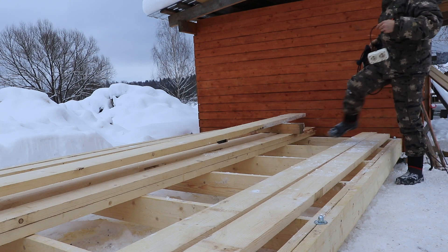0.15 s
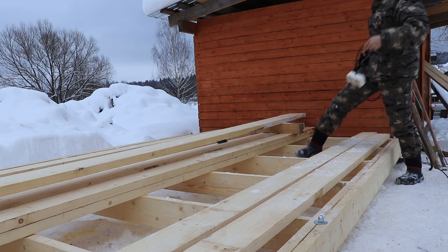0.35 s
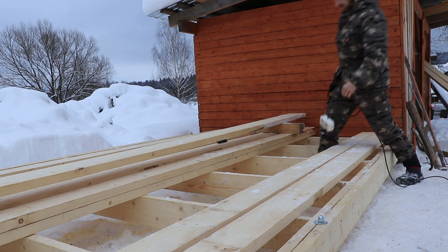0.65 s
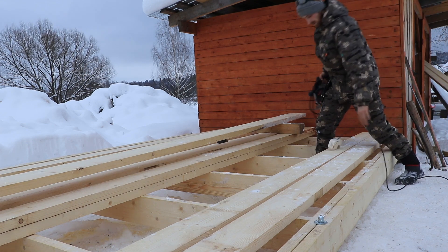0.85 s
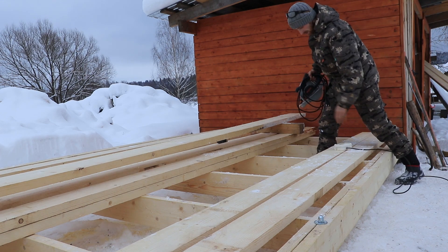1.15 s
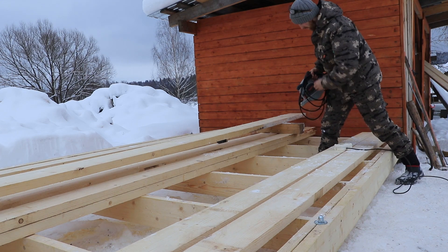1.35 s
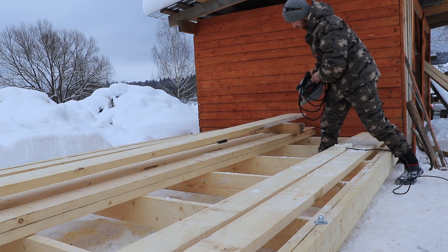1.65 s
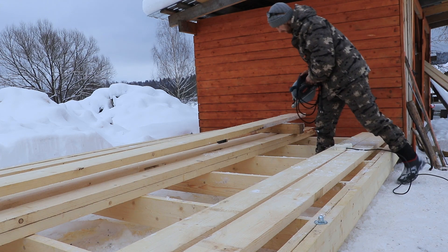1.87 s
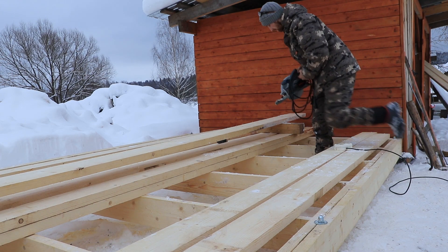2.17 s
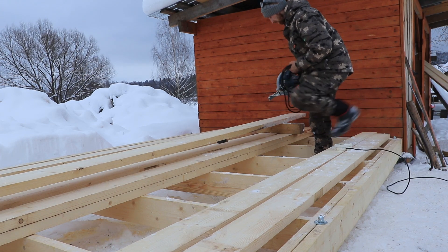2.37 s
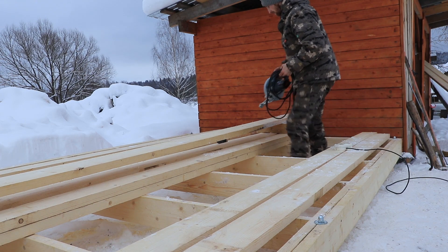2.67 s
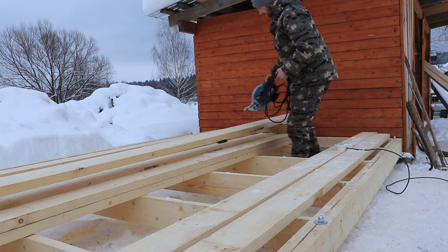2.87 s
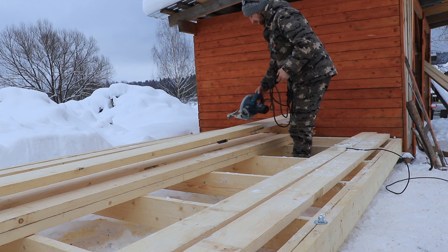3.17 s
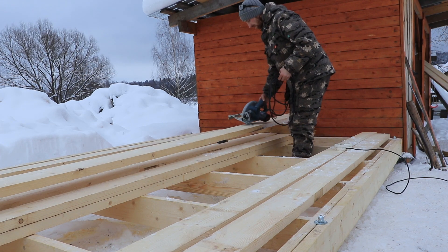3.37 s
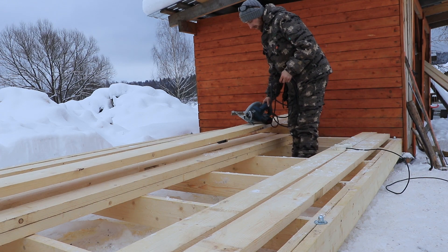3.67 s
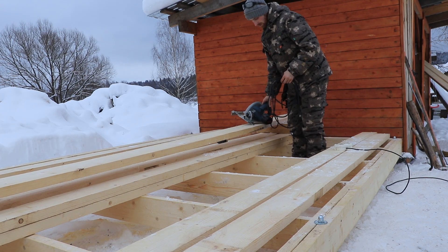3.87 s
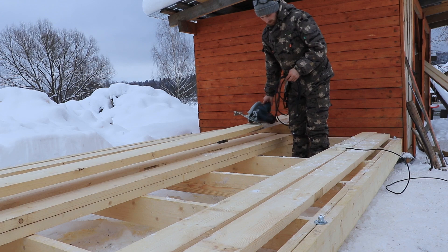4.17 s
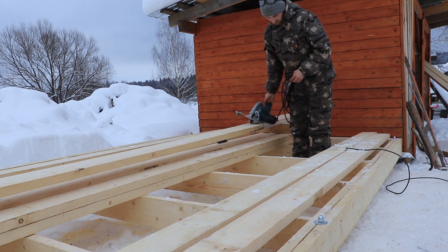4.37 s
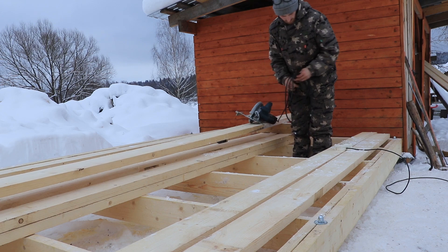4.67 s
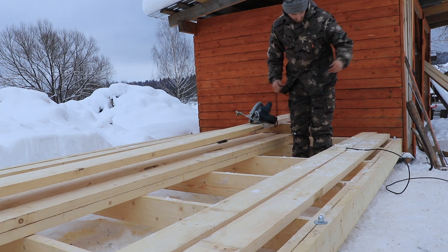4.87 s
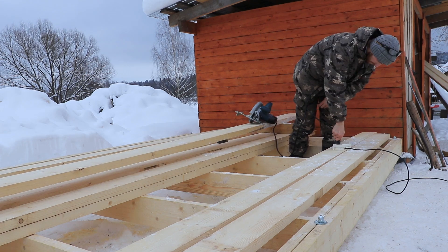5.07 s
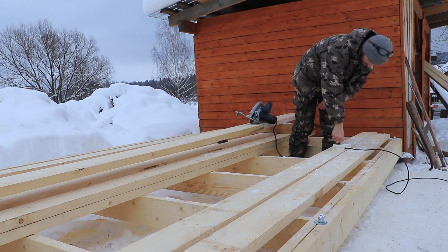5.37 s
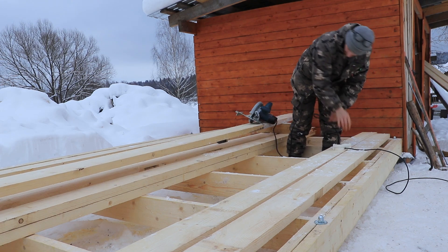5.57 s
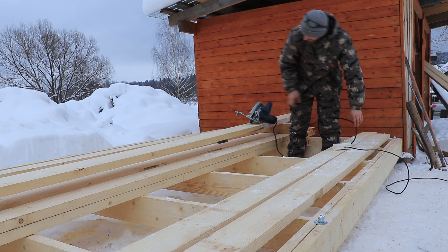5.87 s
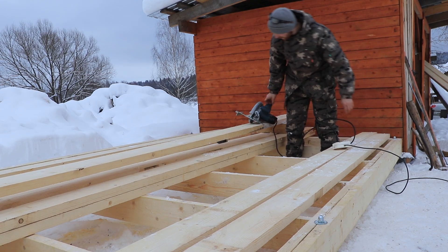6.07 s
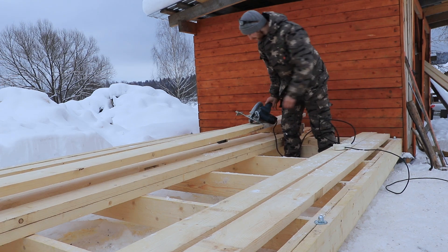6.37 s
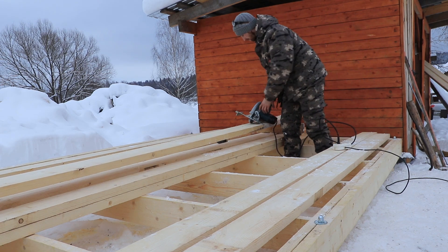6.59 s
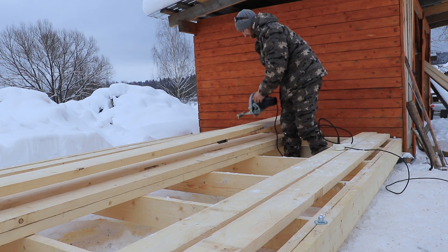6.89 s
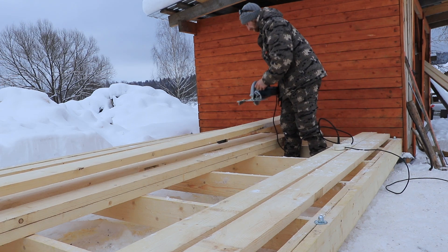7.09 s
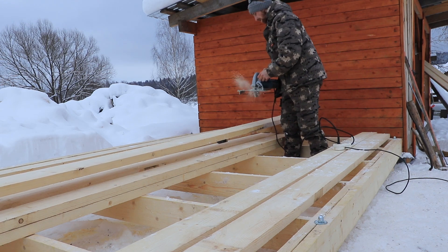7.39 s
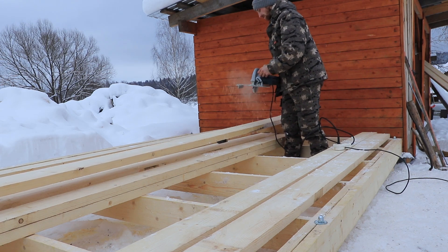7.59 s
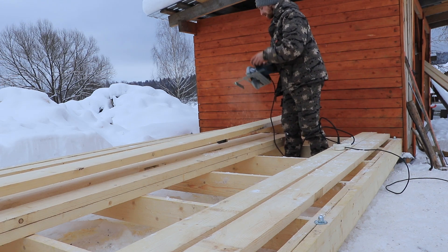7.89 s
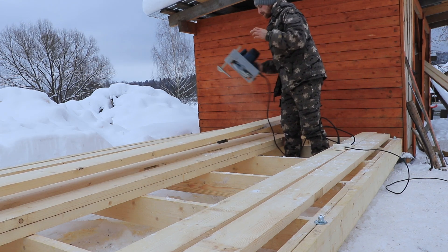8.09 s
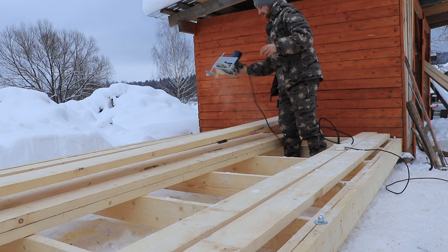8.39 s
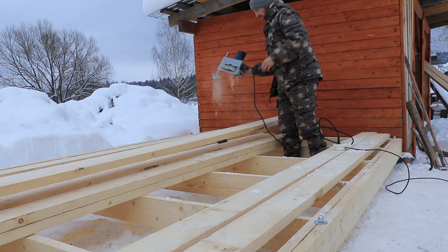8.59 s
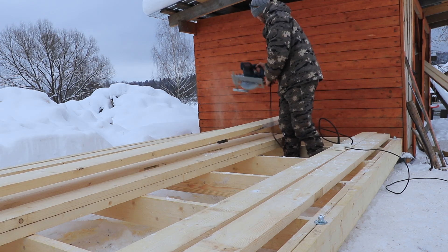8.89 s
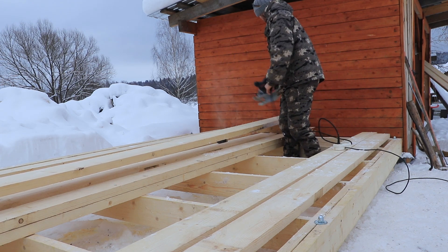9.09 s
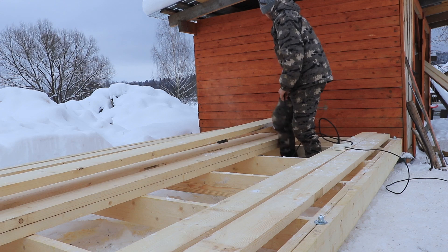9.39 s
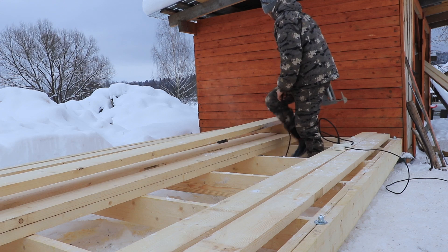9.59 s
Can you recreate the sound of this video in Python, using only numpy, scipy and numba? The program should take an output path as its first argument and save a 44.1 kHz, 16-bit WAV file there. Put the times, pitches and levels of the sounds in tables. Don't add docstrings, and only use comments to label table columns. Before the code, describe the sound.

Boots rustle and knock on a timber frame outdoors, a loud clack rings the planks, then a circular saw blips twice and whines down to rest.

```python
import sys
import numpy as np
from scipy import signal
from scipy.fft import rfft, irfft
from scipy.io import wavfile
from scipy.ndimage import uniform_filter1d
from numba import njit

SR = 44100
rng = np.random.default_rng(int(sys.argv[2]) if len(sys.argv) > 2 else 0)


def decibels_to_gain(level_db):
    exponent = np.asarray(level_db, float) / 20
    return 10 ** exponent


def store_pcm(level_fs):
    pcm = np.round(np.clip(level_fs, -1, 1) * 32767).astype(np.int16)
    wavfile.write(sys.argv[1], SR, np.atleast_2d(pcm).T)


N = 429534
TIME = np.arange(N) / SR

# (frequency [Hz], density [dB])
HISS = [(35, -45), (60, -19), (87, 7), (607, -1.5), (2300, -6), (6740, -12), (14900, -13), (16000, -15)]
HISS_DB = -57
# (peak time [s], rise [s], fall [s], level [dB])
GUSTS = [
    (.1, 0.33, .3, -56),
    (.73, 0.31, .3, -44),
    (1.36, 0.089, 0.18, -43),
    (1.9, .15, .8, -58),
    (2.79, 0.35, 0.16, -55),
    (3.42, 0.026, .3, -45),
    (3.66, .1, .05, -45),
    (4.4, .5, .6, -57),
    (5.86, .4, .3, -71),
    (8.3, 0.56, .08, -65),
]
CALM_DB = -73

# (peak time [s], rise [s], fall [s], level [dB], brightness [dB])
MOVES = [(.02, 0.11, 0.49, -55.5, 1), (.78, 0.16, 0.23, -46, -2.5), (.96, .06, 0.087, -47, 5),
         (1.16, 0.17, 0.24, -52, -4.5), (1.5, 0.092, 0.093, -52.5, 19), (1.92, 0.23, 0.22, -47.5, -1.5),
         (2.2, 0.39, 0.2, -50, 7), (2.42, 0.35, 0.43, -44.5, 6.5), (2.8, 0.23, 0.081, -49, -1.5),
         (3.56, .12, 0.19, -47.5, -5), (3.929, 0.16, 0.17, -49, -1), (4.29, 0.12, 0.057, -54, -11),
         (5.05, 0.28, 0.092, -58, 1), (5.2, 0.33, 0.52, -56.5, -8), (5.56, 0.063, 0.079, -50, -4.5),
         (5.8, 0.099, 0.16, -49.5, 6), (5.99, 0.38, 0.5, -49, -0.5), (6.36, 0.22, .15, -53.5, -4),
         (6.78, 0.62, 0.47, -51.5, -3.5), (7.16, 0.44, 0.41, -60, -8.5), (9.1, 0.54, 0.12, -40, 8.5),
         (9.45, 0.36, 0.15, -47.5, 0.5), (9.559, 0.23, 0.049, -42.5, 3), (9.68, 0.097, 0.054, -46.5, -0.5)]
STILL_DB = -58.5
FADE_DB = 11

# (time [s], peak level [dB], brightness [dB], ring t60 [s])
STEPS = [(.258, -37, -4, 0.031), (.288, -38, -12, 0.035), (.404, -29, -7.5, 0.027), (.525, -36.5, -2, 0.04),
         (.683, -26.5, -24, 0.042), (1.615, -33, -9, 0.034), (2.07, -46, -30, 0.11),
         (2.749, -22, -11, 0.019), (3.301, -41, -8, 0.056), (3.786, -37.5, -13, 0.11),
         (3.859, -38.5, -6, 0.064), (4.997, -39.5, -3, 0.069), (5.619, -33, -8, 0.031),
         (5.824, -30, -24, 0.04), (6.299, -34.5, 0.5, 0.058), (6.801, -37, -26, 0.022),
         (7.034, -41.5, -20, 0.022), (7.057, -35, -11, 0.041), (8.547, -34.5, -10, 0.059),
         (8.92, -43, -14, 0.043), (9.059, -35.5, 5, 0.032), (9.197, -39, -22, 0.094),
         (9.39, -43, -18, 0.067)]
THIN_BLOWS = [(.64, -22, -55, 0.055), (.947, 11, -18, 0.016), (.951, 11.5, -12, 0.016), (.961, 2, -3, 0.022),
              (1.065, 1, -26, 0.012), (1.071, -1, -20, 0.011), (5.158, -32.5, -13, 0.034),
              (5.249, -35.5, -6, 0.17), (5.288, -20, -11, 0.04), (5.317, -14, -12, 0.017),
              (5.327, -29, 9, 0.015), (5.335, -29.5, -14, 0.11), (5.465, -28, -24, 0.014),
              (1.09, -24, -33, 0.045), (1.179, -31, -12, .05), (1.259, -36, -8, .03), (1.335, -40, -8, .02),
              (1.381, -38, -8, .035), (5.955, -4, -26, 0.014), (5.972, -24.5, -39, .051), (6.153, -43, 9, 0.072),
              (6.824, -41, 2, 0.044), (6.922, -23, -22, 0.007), (4.882, -41.5, 0, 0.033)]
SET_DOWNS = [(2.762, -29, 4, 0.032), (2.777, -33.5, -12, 0.037), (3.4, -3, -30, .012),
             (3.403, 2, -28, 0.012), (3.41, -19, -30, 0.14), (3.432, -31, -22, 0.24),
             (3.452, -34, -35, 0.085), (3.519, -26, -14, 0.029), (3.575, -27, -6, 0.13),
             (3.627, -33, -20, 0.14), (3.976, -34, -5, 0.12), (4.138, -34.5, -16, 0.44),
             (4.2, -25, -16, 0.052), (4.219, -31, -22, 0.28), (4.262, -22, -14, 0.035),
             (4.282, -25.5, -22, 0.074), (4.309, -42, -19, .14)]
CLINKS = [(.84, -39, 16, 0.14), (.929, -47, 15, 0.038), (1.566, -46.5, 9.5, 0.18), (2, -41, 10, 0.059),
          (2.291, -33, -8, 0.02), (2.306, -35, 0, .015), (2.327, -30.5, 0, 0.054), (2.362, -37, 23, 0.019),
          (2.368, -34, 13, 0.028), (2.425, -44, 18, 0.06), (3.532, -46, 16, .06), (4.738, -45.5, 7, 0.05),
          (5.229, -34, 6, 0.02), (5.243, -48, 8, .02), (5.26, -42, 0, .02), (5.278, -38, 4, .02),
          (5.492, -43, 10, .02), (5.551, -27, 6, 0.026), (5.588, -38, -5, .03), (6.082, -45.5, 16.5, 0.055),
          (6.329, -36.5, -2, 0.068)]
# (thud [dB], tick [dB], tick gained per brightness [dB/dB], low cut [Hz])
STEP_COLOUR = (2.25, -22, .2, 60)
THIN_COLOUR = (-22.5, -50, 0.27, 190)
SET_DOWN_COLOUR = (-8, -37, 0.14, 50)
CLINK_COLOUR = (-25, -23, .6, 300)
JOLT_COLOUR = (-15, -11, .1, 150)

# (frequency [Hz], level [dB], t60 [s])
SOLE = [(1188, 9, 0.088), (2300, 0.5, 0.11), (2850, 0, 0.14), (3450, -5, 0.15), (1690, -4, 0.078),
        (2050, 1, 0.087), (4400, -15, .08), (5100, -7, .08)]
PLANK = [(211.3, -1.5, .37), (280, -9.5, 0.38), (338, -11.5, 0.28), (407, -3.5, 0.21), (470, -3, 0.13),
         (567, -4.5, 0.22), (658, 2, .16), (741, -4, 0.15), (840, -1.5, .1), (914, -8, 0.117),
         (1020, -12, 0.08), (1265, -17, .08), (1455, -13, .06)]
BEAM = [(119.6, -6, 0.8), (226.8, 0, 0.32), (390, -17, 0.64), (750, 4.5, 0.14), (1180, -19, 0.22),
        (1300, -9, 0.098), (1650, -7, 0.1)]
CLIP = [(896, -4, 0.084), (1690, 1.5, 0.13)]
SLAT = [(513, -11, .08), (690, -1, 0.13), (765, 1, 0.11), (1360, -16, 0.076)]
BOARD = [(220, -7, 0.27), (301, -12, .15), (338, -7.5, 0.21), (427, 0.5, 0.099), (534, -3, 0.15),
         (596, -0.5, 0.061), (700, -6, .18), (750, -10, .16), (830, -5, .18), (938, -4, .14),
         (1070, 0, 0.065), (1190, -12, 0.11)]
BASE = [(724, 0, 0.097), (814, -12, 0.19), (1098, -3, 0.21), (1310, -10, 0.16), (1650, -17, 0.15),
        (2060, -22, 0.2), (2234, -19, 0.2), (2643, -8, 0.083), (2896, -19, 0.12), (3365, -17, 0.071)]
# (level [dB], modes as above)
RINGS = [(-14, PLANK), (-19.5, PLANK), (-23.5, BEAM), (-38, BEAM), (-49, BEAM[:3]), (-29.5, BOARD),
         (-34.5, SOLE[1:]), (-41.5, SOLE), (-37.5, SOLE), (-34, PLANK[3:]), (-29, BOARD[:6]), (-34, CLIP),
         (-22, SLAT), (-38, SLAT), (-50, SLAT), (-26, BASE), (-47, SOLE), (-47, SOLE), (-40, PLANK[3:]),
         (-22, BOARD[:3]), (-41, SOLE[:1]), (-33, BEAM[:1])]
RING_S = [.948, 1.068, 3.403, 4.263, 2.75, 5.956, .841, 2.327, 2.424, 5.288, 5.826, 6.824, 5.284, 5.465,
          4.998, 3.404, 3.577, 4.202, 1.184, 3.432, 3.519, 1.07]

# (time [s], length [s], level [dB])
CRUNCHES = [
    (2.536, 0.017, -34),
    (2.583, 0.021, -39.5),
    (2.609, 0.0075, -38.5),
    (5.577, 0.021, -48),
    (9.652, 0.021, -36.5),
    (9.697, 0.016, -38),
]
# (peak time [s], rise [s], fall [s], level [dB], treble [dB])
DRAGS = [
    (3.47, 0.037, 0.077, -35, 5),
    (3.64, 0.042, 0.042, -40, 9),
    (4.165, 0.029, 0.036, -37.5, 5),
    (4.23, 0.032, .04, -40, 1),
    (4.28, 0.024, 0.044, -35, 4),
    (4.33, .03, 0.038, -41.5, -7),
]
# (frequency [Hz], width [Hz], level [dB])
SOLE_SONG = [(376, 107, 3), (697, 47, -2), (1130, 35, -8), (1300, 23, -1), (1480, 22, -3), (2910, 18, -18),
             (3270, 16, -18), (5200, 79, -18)]
# (time [s], length [s], frequency [Hz], level [dB], sag [Hz])
SQUEAKS = [
    (4.12, 0.07, 7900, -68, 151),
    (4.33, .1, 7850, -64, 50),
    (4.428, .06, 7850, -63, 650),
]

# (time [s], slot rate [Hz])
RUN_UP = [
    (7.35, 300),
    (7.47, 1900),
    (7.52, 2180),
    (7.6, 2040),
    (7.69, 3800),
]
# (from [s], to [s])
PULLS = [
    (7.352, 7.49),
    (7.6, 7.7),
]
# (time [s], level [dB])
KICK = [
    (7.347, -40),
    (7.354, -18),
    (7.366, -10),
    (7.43, -17),
    (7.5, -22.5),
    (7.58, -22.5),
    (7.61, -16.5),
    (7.7, -19.5),
]
# (time [s], level [dB])
RUN_DOWN = [
    (7.9, -19.5),
    (8.1, -22),
    (8.41, -22.5),
    (8.45, -28),
    (8.65, -30.5),
    (8.98, -42),
    (9.1, -50),
    (9.21, -51),
    (9.3, -60),
]
# (time [s], peak level [dB], brightness [dB], ring t60 [s])
JOLTS = [(7.36, -13, -10, 0.014), (7.371, -11, -9, 0.018), (7.594, -28, 20, 0.037), (7.601, -12, -6, 0.021),
         (7.671, -20, 5, .01), (7.922, -24, 15.5, 0.03), (7.988, -16.5, 15.5, 0.017),
         (8.256, -24, -3, .015), (8.396, -28, 9, .012), (8.446, -29, 3, 0.011), (8.547, -27, 0, .012)]
# (frequency [Hz], width [Hz], level [dB])
CASING = [(625, 260, 2), (1000, 190, -17), (1330, 400, 3), (1560, 240, -3), (2280, 1140, -3.5)]
# (frequency [Hz], width [Hz], level [dB])
GUARD = [(2980, 200, -1), (3580, 350, 2), (4850, 850, 1)]
# (frequency [Hz], width [Hz], level [dB])
BLADE = [(923, 31, -17), (1300.5, 44, 2), (1696, 6.3, -7.5), (2066, 23, -4.5), (2935, 59, -3),
         (3090, 35, -9.5), (3665, 59, -9.5)]
# (slot rate [Hz], level [dB])
BLADE_RING = [(1450, 2), (1850, 5.5), (2400, 6.5), (3100, -4.5)]
# (peak time [s], rise [s], fall [s], level
# [dB], frequency [Hz], width [Hz])
SINGING_BANDS = [(7.41, 0.03, 0.06, -17, 1290, 40), (7.54, .04, 0.055, -22, 1650, 110),
                 (7.565, 0.016, 0.016, -25, 598, 80), (7.61, 0.014, 0.12, -29.5, 595, 89),
                 (7.99, .02, 0.036, -18.5, 3440, 160), (7.58, 0.043, .02, -23, 4060, 120),
                 (8.41, 0.023, 0.019, -25, 930, 70), (8.97, 0.023, .025, -43, 1290, 40),
                 (9.07, .02, 0.018, -43, 1300, 40), (9.145, 0.033, .015, -39, 1300, 30),
                 (7.7, .015, .02, -38, 11100, 1500), (8.345, .03, .03, -24, 2070, 30),
                 (8.32, .012, .015, -24, 3060, 60), (8.362, .012, .025, -22, 2910, 40),
                 (8.41, .015, .015, -28, 3600, 60), (8.325, .03, .012, -20, 1340, 70),
                 (8.495, .012, .012, -34, 3150, 120), (8.2, .1, .1, -30, 590, 90), (8.37, .05, .04, -25, 950, 350),
                 (7.86, .12, .1, -27, 3550, 180), (7.9, .1, .08, -27, 1600, 160), (7.93, .04, .05, -26, 520, 60)]
# (frequency [Hz], level [dB])
WHINE_PATH = [(60, -75), (280, -17), (920, -15), (1080, 3), (5400, 3), (6600, -12), (10500, -5),
              (16000, -24)]
# (multiple of pulse rate [1], level [dB])
HUM = [(2, -49), (3, -42), (4, -38), (5, -34), (6, -29), (7, -33), (8, -30), (10, -30), (11, -33),
       (12, -32), (13, -28)]

SLOTS, PINION, FAN_BLADES = 12, 7, 18
GEAR_RATIO, TURN_S = 5.6, 8.502
RELEASE_S, TOP_HZ, BRAKE_HZ_PER_S = 7.72, 3760, 3600
FRICTION_HZ_PER_S, DRAG_PER_S = 985, .965
BIND_S, BIND_OVER_S, BIND_HZ = 8.8, .05, 27
MAINS_HZ, HUM_DB = 100, 0.5
WHINE_DB, WHINE_DB_PER_ORDER, WHINE_DB_PER_DECADE, WHINE_AT_HZ = -33.5, -1.8, 9, 1200
BARS_DB, SHAFT_DB, FAN_DB = 4.5, -31, -30
MESH_DB, SIDEBAND_DB, MESH_HZ, MESH_WIDTH_HZ = -13, -19, 1330, 92
FAN_PEAK_HZ, FAN_WIDTH_HZ = 4900, 500
HOWL_HZ, HOWL_WIDTH_HZ, HOWL_DB = 1310, 110, 10
SLOW_HZ, SLOW_DB_PER_ORDER = 600, 1.6
SLACK_HZ, SLACK_DB, SLACK_DB_PER_DECADE = 3200, 4, 3
FLARE_HZ, FLARE_WIDTH_HZ, FLARE_DB, RIM_DB = 1660, 136, 17, -13


def level(x):
    return x / np.sqrt(np.mean(x ** 2))


def read(table, silent=-120.):
    s, values = np.transpose(table)
    return np.interp(TIME, s, values, silent, silent)


def band(x, lo_hz, hi_hz, order=2):
    return signal.sosfilt(signal.butter(order, [lo_hz, hi_hz], "bandpass", fs=SR, output="sos"), x)


def resonate(x, peaks):
    out = 0
    for k, (hz, width, db) in enumerate(peaks):
        out = out + (-1) ** (k // 2) * decibels_to_gain(db) * band(x, hz - width / 2, hz + width / 2, order=1)
    return out


def bump(hz, centre_hz, width_hz):
    return 1 / (1 + ((hz - centre_hz) / width_hz) ** 2)


def walk(rate):
    k = int(SR / rate)
    steps = np.repeat(rng.standard_normal(N // k + 1), k)
    return 1.45 * uniform_filter1d(uniform_filter1d(steps, k), k)[:N]


def grit(scatter_db):
    size = np.minimum(rng.exponential(size=N // 32 + 1), 3.5)
    return level(rng.standard_normal(N) * decibels_to_gain(scatter_db * np.repeat(size, 32)[:N]))


def swell(s, rise_s, fall_s, db):
    away = np.where(TIME < s, (s - TIME) / max(rise_s, .01), (TIME - s) / max(fall_s, .01))
    return decibels_to_gain(db - FADE_DB * away)


def add(out, s, sound):
    i = int(s * SR)
    out[i:i + len(sound)] += sound[:N - i]


def air_floor():
    hz, db = np.transpose(HISS)
    bins_hz = np.arange(1, N // 2 + 2) * SR / N
    shape = decibels_to_gain(np.interp(np.log(bins_hz), np.log(hz), db))
    hiss = level(irfft(rfft(rng.standard_normal(N)) * shape, N)) * decibels_to_gain(HISS_DB)
    wind = decibels_to_gain(CALM_DB) + np.max([swell(*gust) for gust in GUSTS], axis=0)
    rumble = level(band(rng.standard_normal(N), 6.5, 43, order=3))
    return hiss + rumble * wind * decibels_to_gain(walk(8.3))


def rustle():
    body, scrape, swish = decibels_to_gain(STILL_DB + 1.0), decibels_to_gain(STILL_DB), decibels_to_gain(STILL_DB - 5)
    for s, rise_s, fall_s, db, bright_db in MOVES:
        effort = swell(s, rise_s, fall_s, db)
        body = np.maximum(body, effort * decibels_to_gain(0.4 - bright_db))
        scrape = np.maximum(scrape, effort)
        swish = np.maximum(swish, effort * decibels_to_gain(-10 + 0.33 * bright_db))
    grains = grit(2.6)
    low = level(band(grains, 115, 1120))
    mid = level(band(grains, 520, 3320))
    high = band(grains, 2360, 5400) + 0.63 * band(grains, 4900, 4920) + 0.44 * band(grains, 4200, 12300)
    out = body * decibels_to_gain(0.64 * walk(23)) * low
    out = out + scrape * decibels_to_gain(1.5 * walk(33)) * mid
    return out + swish * decibels_to_gain(0.6 * walk(27)) * level(high)


def knocks(kinds):
    out, hz = np.zeros(N), 125 * 2 ** np.arange(0, 7, .5)
    t = np.arange(int(.3 * SR)) / SR
    noise = rng.standard_normal(N)
    bands = np.array([level(band(noise, f / 1.25, f * 1.25)) for f in hz])
    push = np.array([band(1. * (t == 0), f / 1.3, f * 1.3, order=3) for f in hz])
    push = push / np.abs(push).max(axis=1)[:, None]
    rise = 1 - np.exp(-t * hz[:, None] / .8)
    colour_hz = [125, 180, 300, 480, 1000, 2500, 7000, 14000]
    for table, (thud_db, tick_db, gained, low_hz) in kinds:
        low_cut = signal.butter(3, low_hz, "highpass", fs=SR, output="sos")
        for s, db, crack_db, t60 in table:
            top_db = tick_db + gained * crack_db
            colour_db = [thud_db - 10.5, thud_db, thud_db / 2 - 1.5, 0, -2.5, crack_db, top_db, top_db]
            colour = np.interp(np.log(hz), np.log(colour_hz), colour_db)
            decay = (np.clip(t60, .005, .3) * (700 / hz) ** .45)[:, None]
            shape = rise * (decibels_to_gain(-60 * t / decay) + decibels_to_gain(-29.5 - 60 * t / (5.4 * decay)))
            i = min(int(s * SR), N - len(t))
            crack = shape * bands[:, i:i + len(t)]
            blow = (decibels_to_gain(db + colour)[:, None] * (crack + 1.03 * push)).sum(axis=0)
            add(out, s, signal.sosfilt(low_cut, blow))
    return out


def yard(x, echo_db=-18, tail_db=-22, t60=0.077):
    t = np.arange(int(.4 * SR)) / SR
    noise = rng.standard_normal(len(t))
    slap = noise * np.exp(-((t - .015) / 0.0011) ** 2)
    slap = level(band(slap, 120, 1400, order=1)) * decibels_to_gain(echo_db)
    tail = noise * np.exp(-np.log(1000) * t / t60) * (t > .006)
    tail = level(band(tail, 110, 2900, order=1)) * decibels_to_gain(tail_db)
    return x + signal.fftconvolve(x, (slap + tail) / np.sqrt(len(t)))[:N]


def ring(hz, db, t60):
    phase = rng.random(len(hz))
    t = np.arange(int(min(np.max(t60), .45) * SR))[:, None] / SR
    flutter = 3.5 * walk(190)[:len(t) * len(hz)].reshape(len(hz), -1).T.clip(-3, 1.2)
    modes = decibels_to_gain(db + flutter) * np.sin(2 * np.pi * (hz * t + phase)) * np.exp(-np.log(1000) * t / t60)
    rise_s = .003 * 700 / hz
    return (modes * (1 - np.exp(-t / rise_s))).sum(axis=1)


def planks():
    out = np.zeros(N)
    for s, (db, modes) in zip(RING_S, RINGS):
        hz, mode_db, t60 = np.transpose(modes)
        add(out, s, decibels_to_gain(db) * ring(hz, mode_db, t60))
    return out


def crunches():
    effort = sum(decibels_to_gain(db) * np.exp(-((TIME - s) / length) ** 2) for s, length, db in CRUNCHES)
    return effort * level(band(grit(1.5), 710, 3240))


def drags():
    grains, out = grit(2.2), 0
    low = level(resonate(grains, SOLE_SONG[:5]))
    high = level(resonate(grains, [(hz, 4 * width, db) for hz, width, db in SOLE_SONG[5:]]))
    for s, rise_s, fall_s, db, treble_db in DRAGS:
        out = out + swell(s, rise_s, fall_s, db) * (low + decibels_to_gain(treble_db - 20.5) * high)
    return out * decibels_to_gain(3.4 * walk(70))


def squeaks():
    out = 0
    for s, length, hz, db, sag_hz in SQUEAKS:
        part = (TIME - s) / length
        pitch = (hz - sag_hz * np.clip(part, 0, 1)) * (1 + .006 * walk(150))
        held = uniform_filter1d(1. * (part > 0) * (part < 1), size=600)
        out = out + held * decibels_to_gain(db + 1.7 * walk(78)) * np.sin(2 * np.pi * np.cumsum(pitch) / SR)
    return out


def coasting():
    rest = FRICTION_HZ_PER_S / DRAG_PER_S
    knee = BRAKE_HZ_PER_S / DRAG_PER_S - rest
    since = np.maximum(TIME - RELEASE_S, 0)
    late = since - (TOP_HZ - knee) / BRAKE_HZ_PER_S
    braked = TOP_HZ - BRAKE_HZ_PER_S * since
    bind = BIND_HZ / (1 + np.exp((BIND_S - TIME) / BIND_OVER_S))
    free = (knee + rest) * np.exp(-DRAG_PER_S * late) - rest - bind
    return np.where(late < 0, braked, free).clip(1)


def gear_throb(free_hz, slots):
    turns = (slots - np.interp(TURN_S, TIME, slots)) / SLOTS / GEAR_RATIO
    depth_db = SLACK_DB + SLACK_DB_PER_DECADE * np.log10(SLACK_HZ / free_hz)
    depth_db = np.clip(4 * (SLACK_HZ / free_hz - 1), 0, 1) * depth_db
    cycle = np.cos(2 * np.pi * turns) - .1 * np.cos(4 * np.pi * turns) - .15 * np.sin(4 * np.pi * turns)
    return np.clip(depth_db, 0, 7) * (cycle + .25 * walk(30))


def gear_rattle(grains, rattle_db, throb):
    rattle = level(band(resonate(grains, CASING), 423, 7100)) * decibels_to_gain(rattle_db + throb)
    return rattle + level(band(grains, 130, 330)) * decibels_to_gain(rattle_db - 30)


def blade(grains, rattle_db, throb, free_hz):
    ring_db = np.interp(free_hz, *np.transpose(BLADE_RING))
    bite_db = 6.5 * np.exp(-np.abs(TIME - PULLS[0][0]) / 0.14)
    struck = grains * decibels_to_gain(rattle_db + ring_db + bite_db + 1.25 * throb) / np.std(resonate(grains, BLADE))
    rim_db = RIM_DB + FLARE_DB * np.exp(-((free_hz - FLARE_HZ) / FLARE_WIDTH_HZ) ** 2)
    rim_db = rim_db + 9 * np.log10(np.minimum(free_hz / FLARE_HZ, 1))
    sound = resonate(struck, BLADE[:3]) + resonate(struck * decibels_to_gain(rim_db), BLADE[3:])
    return band(sound, 500, 5000) / (1 + (300 / free_hz) ** 4)


def draught(free_hz, throb, buzz):
    grains = grit(2.4) * buzz
    air_db = -21 + 46 * np.log10(np.minimum(free_hz / 2650, 1))
    air_db = air_db - 2.5 * (TIME < RELEASE_S) + throb / 2
    return level(resonate(grains, GUARD) + .42 * band(grains, 3000, 7000)) * decibels_to_gain(air_db)


def brushes(slot_hz):
    hiss_db = -33.5 + 36 * np.log10(slot_hz / TOP_HZ)
    hiss_db = np.maximum(hiss_db, np.where(TIME < RELEASE_S, -37.5, -120))
    return level(band(grit(0.97), 4300, 11700)) * decibels_to_gain(hiss_db)


def mains_hum(power):
    hum = 0
    for k, db in HUM:
        tone = np.sin(2 * np.pi * (k * MAINS_HZ * TIME + k * k / 7))
        hum = hum + decibels_to_gain(HUM_DB + db + 2.5 * walk(40)) * tone
    return power ** 2 * hum


def gear_mesh(slot_hz, slots, throb):
    out = 0
    for teeth, db in (PINION, MESH_DB), (PINION + 1, SIDEBAND_DB):
        gain = bump(slot_hz * teeth / SLOTS, MESH_HZ, MESH_WIDTH_HZ)
        gain = gain * (TIME > RELEASE_S) * np.minimum(slot_hz / WHINE_AT_HZ, 1) ** 3
        out = out + decibels_to_gain(db + 1.8 * walk(53) + .8 * throb) * gain * np.sin(2 * np.pi * slots * teeth / SLOTS)
    return out


def fan(slot_hz, slots, whine):
    gain = bump(slot_hz * FAN_BLADES / SLOTS, FAN_PEAK_HZ, FAN_WIDTH_HZ) * (TIME > RELEASE_S)
    tone = np.sin(2 * np.pi * slots * FAN_BLADES / SLOTS)
    return whine * decibels_to_gain(FAN_DB + 1.5 * walk(34)) * gain * tone


def slot_whine(slot_hz, slots, whine, throb, on):
    path_hz, path_db = np.transpose(WHINE_PATH)
    orders = [(1 / SLOTS, SHAFT_DB)] + [(k, WHINE_DB + WHINE_DB_PER_ORDER * k) for k in range(1, 23)]
    live = np.flatnonzero(on)
    slow = np.clip(1 - slot_hz[live] / SLOW_HZ, 0, 1)
    out = np.zeros(N)
    for k, db in orders:
        bars = (k == 2) / 2 + 0.1 * (k == 4) + 0.4 * (k == 3) + 0.3 * (k % 2 == 0) + .3 * (k > 4) - (k == 1)
        hz = k * slot_hz[live]
        howl_db = HOWL_DB * bump(hz, HOWL_HZ, HOWL_WIDTH_HZ) * (k == 2)
        sharp_db = SLOW_DB_PER_ORDER * max(k - 4, 0) * slow
        heard_db = np.interp(np.log(hz), np.log(path_hz), path_db)
        total_db = db + BARS_DB * bars + howl_db + sharp_db + heard_db
        total_db = total_db + 3 * walk(40)[live] + .35 * throb[live]
        gain = whine[live] * decibels_to_gain(total_db) * (hz < .36 * SR)
        phase = 2 * np.pi * k * slots[live] + (.3 + .09 * k) * walk(120)[live]
        out[live] += gain * np.sin(phase)
    return out


def singing_bands(texture):
    out = 0
    for s, rise_s, fall_s, db, hz, width in SINGING_BANDS:
        out = out + swell(s, rise_s, fall_s, db) * level(band(texture, hz - width / 2, hz + width / 2))
    return out


def saw():
    free_hz = coasting()
    slot_hz = np.where(TIME < RUN_UP[-1][0], read(RUN_UP, silent=1.), free_hz)
    slots = np.cumsum(slot_hz) / SR
    on = uniform_filter1d(1. * (TIME > PULLS[0][0]) * (free_hz > 1), size=600)
    power = uniform_filter1d(sum(1. * (TIME > a) * (TIME < b) for a, b in PULLS), size=2000)
    throb = gear_throb(free_hz, slots)
    rattle_db = read(KICK + RUN_DOWN)
    buzz = 1 + .5 * np.exp(-np.abs(TIME - 7.41) / 0.034) * np.sin(2 * np.pi * MAINS_HZ * TIME)
    texture = grit(1.1)
    grains = texture * buzz
    whine_db = -30 * power + 3 * (TIME < RELEASE_S) + WHINE_DB_PER_DECADE * np.log10(slot_hz / WHINE_AT_HZ)
    whine = on * decibels_to_gain(whine_db) / (1 + (260 / slot_hz) ** 4)
    gears = gear_rattle(grains, rattle_db, throb) + blade(grains, rattle_db, throb, free_hz)
    noises = on * (draught(free_hz, throb, buzz) + brushes(slot_hz) + singing_bands(texture) * buzz)
    tones = on * mains_hum(power) + gear_mesh(slot_hz, slots, throb) + fan(slot_hz, slots, whine)
    tones = tones + slot_whine(slot_hz, slots, whine, throb, on)
    jolts = band(knocks([(JOLTS, JOLT_COLOUR)]), 300, 16000)
    return gears + noises + tones + jolts


def scene():
    blows = knocks([(STEPS, STEP_COLOUR), (THIN_BLOWS, THIN_COLOUR), (SET_DOWNS, SET_DOWN_COLOUR),
                    (CLINKS, CLINK_COLOUR)])
    blows = yard(blows + planks())
    return (air_floor() + rustle() + blows + crunches() + drags() + squeaks() + saw())[None]


@njit
def limiter(x, top, attack, release, slope):
    y, e = np.empty(len(x)), 0.
    for i in range(len(x)):
        e += (abs(x[i]) - e) * (attack if abs(x[i]) > e else release)
        y[i] = x[i] * min(1., (top / (e + 1e-9)) ** slope)
    return y


def top_cut(x):
    return signal.sosfilt(signal.butter(12, 16450, fs=SR, output="sos"), x)


def record(dry):
    held = limiter(dry[0], 0.3, 1 / (0.0031 * SR), 1 / (.09 * SR), 0.63)
    low_pass = signal.ellip(8, .2, 60, 15900, fs=SR, output="sos")
    mix = signal.sosfilt(low_pass, np.clip(held, -1, 1))[None]
    return top_cut(mix)


dry = scene()
out = record(dry)
store_pcm(out)
```